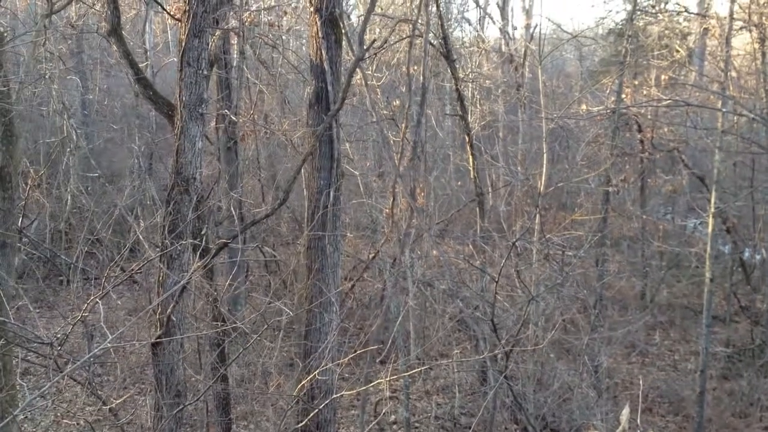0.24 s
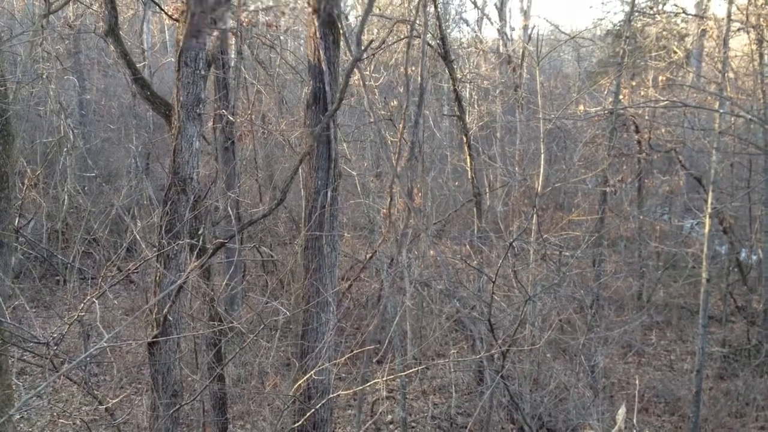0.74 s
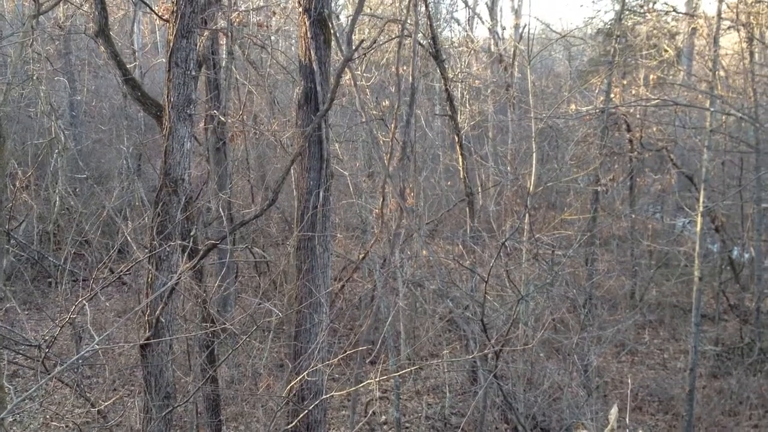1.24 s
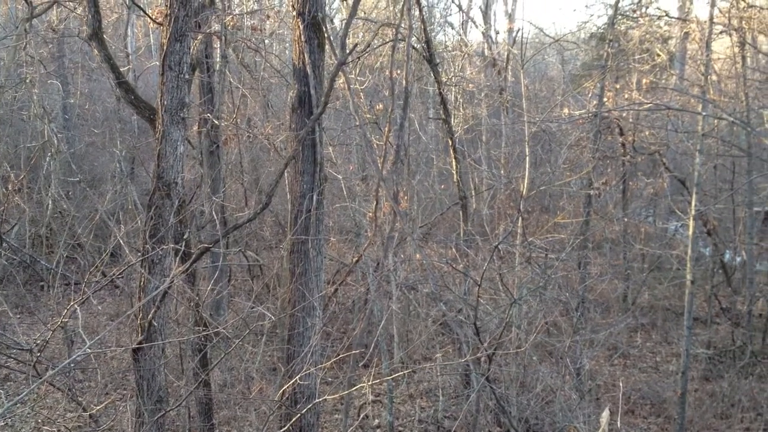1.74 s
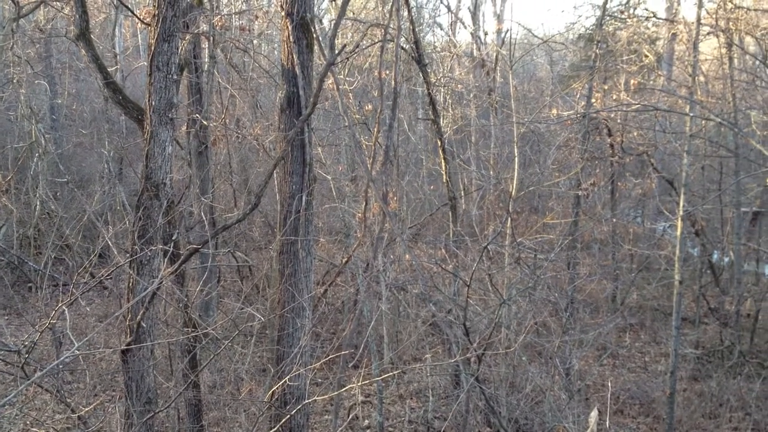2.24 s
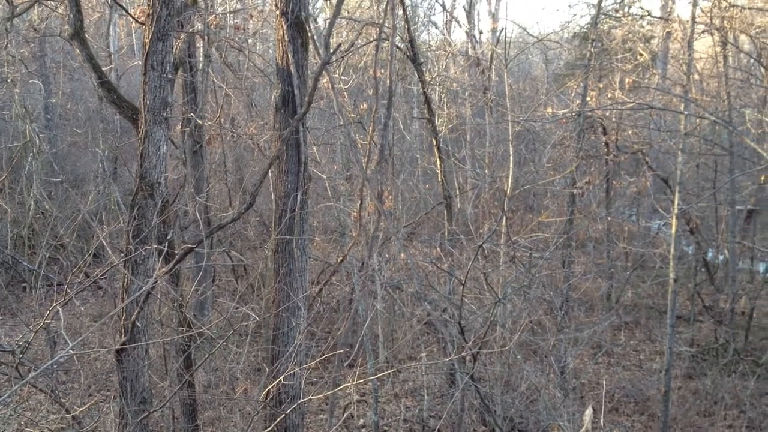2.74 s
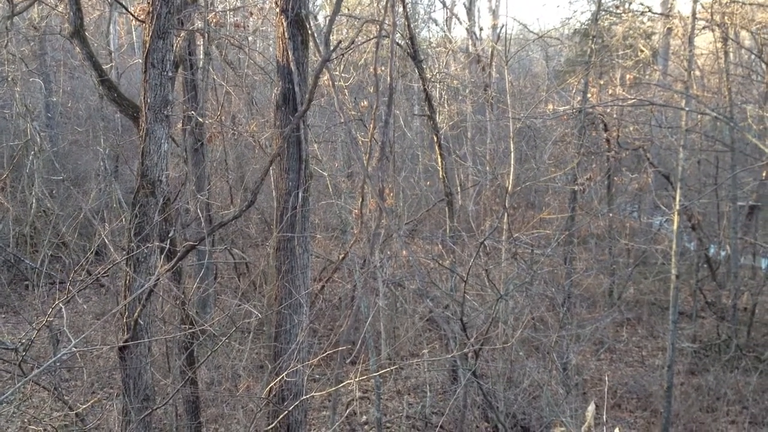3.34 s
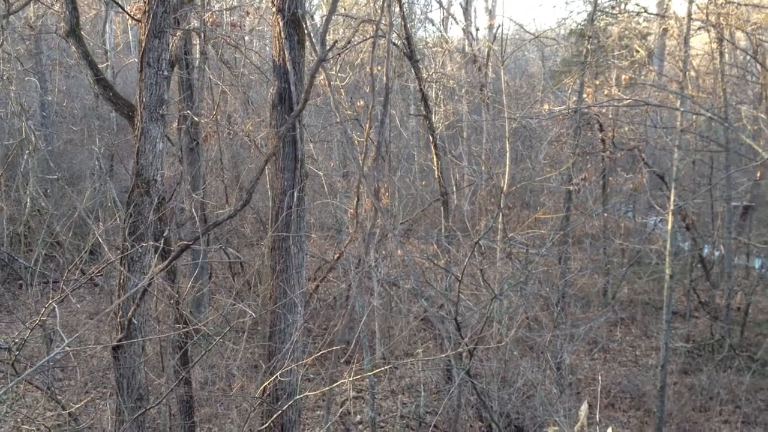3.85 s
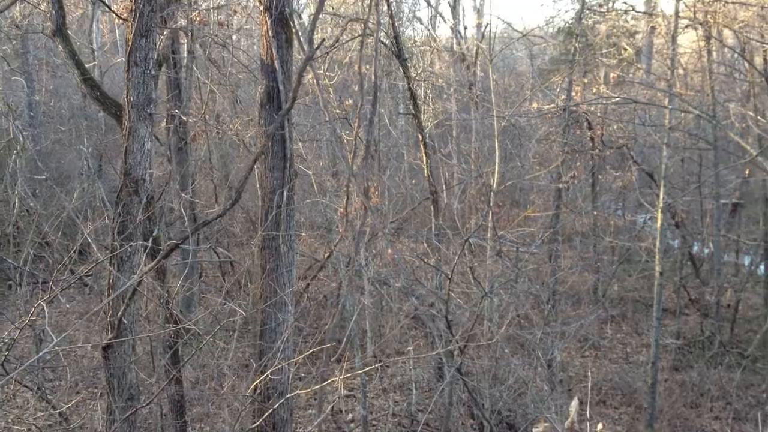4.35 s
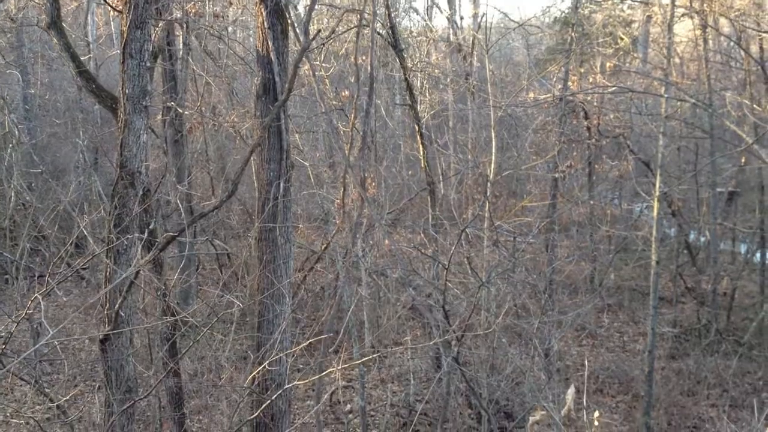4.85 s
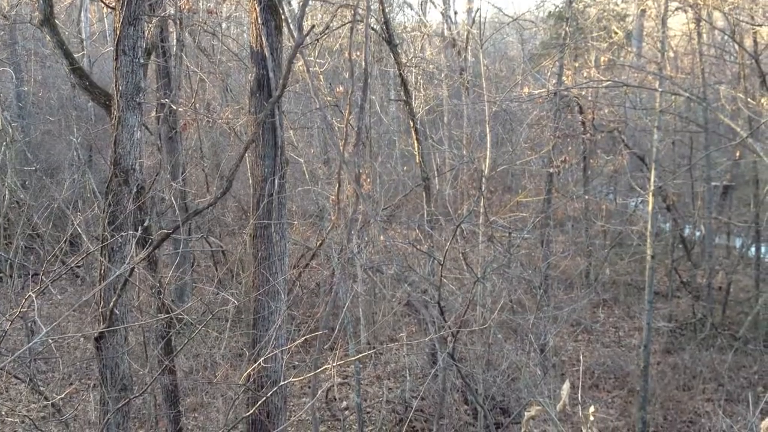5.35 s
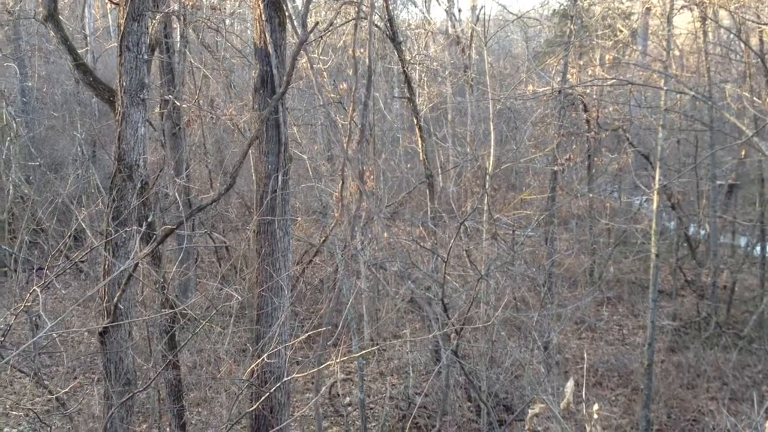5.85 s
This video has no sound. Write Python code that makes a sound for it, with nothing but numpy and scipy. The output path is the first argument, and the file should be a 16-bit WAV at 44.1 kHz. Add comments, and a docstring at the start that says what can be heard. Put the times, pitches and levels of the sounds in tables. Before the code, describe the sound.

A distant hound bays eight times at a steady pace, echoing through quiet woods, with a few faint bird chips.

```python
"""Over faint hiss, a hound is already baying on a scent, far off in bare winter woods.
Each of its eight bays opens wide-mouthed and bright, flips up into a pure hoot as the muzzle closes,
then drops away; trunks scatter it into a long ringing tail. A small bird chips three times early on,
a twig ticks midway, and the bird chips once more after the last bay."""
import sys
import numpy as np
from scipy import signal
from scipy.fft import rfft, irfft, next_fast_len
from scipy.io import wavfile

SR = 44100
rng = np.random.default_rng(int(sys.argv[2]) if len(sys.argv) > 2 else 0)


def unload_wav(signal):
    """Save mono or channel-first audio to the path in sys.argv[1] as 16-bit WAV at rate SR, clipped to [-1, 1]."""
    wavfile.write(
        sys.argv[1],
        SR,
        np.round(np.clip(np.atleast_2d(signal).T, -1, 1) * 32767).astype(np.int16),
    )


N = 268128
LEAD = int(.25 * SR)   # samples before time zero
TRACK_SIZE = LEAD + N


# Bays: start_s, cry_s, hoot_s, cry_hz, hoot_hz, scoop_s, sag_hz_per_s, cry_db, hoot_db, attack_s,
# release_db, cry_octave_db, hoot_octave_db, cry_upper_db
BAY_CALLS = [ (-.125, .085, .125, 472, 532.4, 0.055, 310, -37.5, -31, 0.028, 48.5, -2, -21, -12),
             (0.671, 0.07, 0.11, 466.6, 526.3, 0.016, 280, -40, -34.5, 0.011, 20, 5, -23.5, -8.5),
             (1.4, 0.08, 0.13, 458.7, 514.5, 0.05, 297.5, -37, -38, 0.029, 23, 1, -21, -4),
             (2.156, .089, .11, 460.5, 523.5, 0.041, 305, -37, -36.5, 0.033, 23.5, 7, -18.5, -8),
             (2.825, .085, .11, 448, 490.8, 0.044, 510, -45.5, -52, 0.015, 15, -6.5, 5, -10),
             (3.543, .094, .135, 489, 536.2, .038, 823, -35.5, -33.5, 0.022, 38.5, -1.5, -21.5, -6.5),
             (4.233, 0.1, .108, 468.4, 523.2, 0.063, 607, -37, -31.5, 0.025, 31, -6, -31, -10),
             (4.95, .091, 0.094, 463.6, 523.3, 0.038, 285, -38, -33, 0.03, 24.5, -2, -26.5, -6.5), ]

def hound():
    """The dog runs on between bays, so each one rings differently through the trees."""
    out = np.zeros(TRACK_SIZE)
    for start_s, *shape in BAY_CALLS:
        add(out, start_s, woods(voice(*cry_to_hoot(*shape)), wet_db=-5.5))
    return out


def cry_to_hoot(cry_s, hoot_s, cry_hz, hoot_hz, scoop_s, sag_hz_per_s, cry_db, hoot_db, attack_s,
                release_db, cry_octave_db, hoot_octave_db, cry_upper_db):
    """The cry scoops up and sags as the jaw opens; the muzzle closes into a hoot that holds, then falls."""
    attack_depth_db, opening_db_per_s, flare_db = 31.5, 167, 11
    flip_s, flip_dip_db, climb_s, brightening_db = .0068, 3, .011, 18.5
    t = np.arange(int((cry_s + hoot_s) * SR)) / SR
    scoop = np.maximum(1 - t / scoop_s, 0) ** 2
    # rows: pitch_hz, level_db, octave_db, upper_db
    cry = np.array([
        cry_hz * (1 - .24 * scoop) - sag_hz_per_s * np.maximum(t - scoop_s, 0),
        cry_db - attack_depth_db * np.exp(-t / attack_s),
        cry_octave_db + opening_db_per_s * (t - cry_s / 2),
        cry_upper_db - flare_db * np.clip(2 * t / cry_s - 1, 0, 1) ** 2])
    since_flip_s = np.maximum(t - cry_s, 0)
    progress = since_flip_s / hoot_s
    release = progress ** 2.9
    hoot = np.array([
        hoot_hz * (1 - .063 * np.exp(-since_flip_s / climb_s) - .42 * progress ** 4.6),
        hoot_db - release_db * release,
        hoot_octave_db + brightening_db * release,
        -29 + brightening_db * release])
    closed = (1 + np.tanh((t - cry_s) / flip_s)) / 2
    pitch_hz, level_db, octave_db, upper_db = cry + closed * (hoot - cry)
    dip_db = flip_dip_db / np.cosh((t - cry_s) / flip_s)
    share_db = -10 * np.log10(1 + from_db(octave_db) ** 2)   # fundamental and octave share the power
    return pitch_hz, level_db - dip_db + share_db, octave_db, upper_db - share_db


# Throat response for the upper partials: freq_hz, gain_db
THROAT_RESPONSE = [(1000, 13.5), (1370, -5.5), (1830, -10), (2330, -12.5), (2650, -35), (3500, -39.5),
                   (4700, -27), (6000, -74)]
# Escaping breath spectrum: freq_hz, relative_db
RASP_SPECTRUM = [(60, -50), (150, -23), (350, -60), (600, 10.5), (950, -7), (1400, -14), (2300, -10.5),
                 (2900, -62), (6000, -37), (10000, -57)]

def voice(pitch_hz, level_db, octave_db, upper_db, slack_hz=385, taut_hz=445, hoot_hz=500):
    """Vocal folds give harmonics and a puff of air each cycle; slack or weakly driven, they turn hoarse."""
    shimmer, flutter, rasp_db, growl_db, full_voice_db = .091, .37, -26.5, -25, -45
    size = len(pitch_hz)
    t = np.arange(size) / SR
    slack = np.clip((taut_hz - pitch_hz) / (taut_hz - slack_hz), 0, 1)
    jitter = (.0042 + .018 * slack) * drift(110, size)
    phase = 2 * np.pi * np.cumsum(pitch_hz * (1 + jitter)) / SR
    low = np.sin(phase) + from_db(octave_db) * np.sin(2 * phase)
    upper = sum(gain_at(THROAT_RESPONSE, k * pitch_hz) * np.sin(k * phase + k * k) for k in range(3, 12))
    tone = low * (1 + shimmer * drift(73, size))
    tone += from_db(upper_db) * upper * (1 + flutter * drift(150, size))
    openness = np.sqrt(from_db(octave_db) ** 2 + from_db(upper_db) ** 2 + .29)
    puffs = noise(RASP_SPECTRUM, SR)[:size] * (1 + np.cos(phase)) / 2
    weakness = np.clip((full_voice_db - level_db - 20 * np.log10(openness)) / 10, 0, 1)
    hoarseness_db = np.maximum(20 * slack, 17 * weakness)
    rasp = openness * from_db(rasp_db + hoarseness_db) * puffs
    # alternate cycles differ as the voice flips up: a weak line between the first two partials
    flipped = np.clip((pitch_hz - taut_hz) / (hoot_hz - taut_hz), 0, 1) ** 2
    growl = from_db(growl_db) * flipped * drift(30, size) * np.sin(1.5 * phase)
    fade = np.clip(np.minimum(t, t[-1] - t) / .00098, 0, 1)
    return np.sqrt(2) * from_db(level_db) * fade * (tone + rasp + growl)


# Trunk echo envelope at nearness 1: delay_s, relative_db
ECHO_DECAY = [(0.01, 1.5), (.05, -3.5), (.11, -5), (0.202, -10.5), (.3, -15), (.45, -19.5), (.6, -23),
              (.9, -32), (1.3, -56)]
# Trunk echo colour: freq_hz, gain_db
ECHO_COLOUR = [(200, -31), (430, -3.5), (520, 1.5), (920, 2.5), (1400, 5), (2300, 3), (7000, 5)]

def woods(x, wet_db, nearness=1.0, echoes_per_s=900):
    """Direct sound plus a small echo from each trunk, new for each position; nearness shortens the tail."""
    delay_s, echo_db = np.transpose(ECHO_DECAY)
    t = np.arange(SR + SR // 2) / SR * nearness
    echoes = rng.standard_normal(len(t)) * (rng.random(len(t)) < echoes_per_s / SR)
    echoes *= from_db(np.interp(t, delay_s, echo_db)) * (t > delay_s[0]) * (t < delay_s[-1])
    echoes /= np.sqrt(np.sum(echoes ** 2))
    response = from_db(wet_db) * coloured(echoes, ECHO_COLOUR)
    response[0] += 1   # direct path
    return signal.fftconvolve(x, response)


# Bird chips: start_s, relative_db, nominal_pitch_hz
BIRD_CHIPS = [(0.0942, -51.5, 7490), (0.5296, -59.5, 7200), (1.7672, -60.5, 7560), (5.5792, -57, 7720)]

def bird(swell_s=.0032, slide_s=.009, gain_db=-7):
    """Each chip is a thin whistle that slides quickly down, in nearby brush."""
    out = np.zeros(TRACK_SIZE)
    t = np.arange(SR // 20) / SR
    envelope = t / swell_s * np.exp(1 - t / swell_s)
    for start_s, relative_db, nominal_pitch_hz in BIRD_CHIPS:
        pitch_hz = nominal_pitch_hz * (.97 + .08 * np.exp(-t / slide_s))
        whistle = np.sin(2 * np.pi * np.cumsum(pitch_hz) / SR)
        chip = from_db(relative_db + gain_db) * envelope * whistle
        add(out, start_s, woods(chip, wet_db=1, nearness=6.5))
    return out


# Twig ticks: start_s, level_db
TWIG_TICKS = [(3.321, -58.5)]
# Crack spectrum: freq_hz, relative_db
CRACK_SPECTRUM = [(800, -14), (3500, -7), (6800, 0), (9000, -6), (14000, -20)]

def twig(decay_s=.0018):
    """Dry wood gives a sharp crack that the nearby brush scatters."""
    out = np.zeros(TRACK_SIZE)
    t = np.arange(SR // 100) / SR
    for start_s, level_db in TWIG_TICKS:
        crack = from_db(level_db) * np.exp(-t / decay_s) * noise(CRACK_SPECTRUM, len(t))
        add(out, start_s, woods(crack, wet_db=3, nearness=4.0))
    return out


# Background spectrum: freq_hz, relative_db
AIR_SPECTRUM = [(25, -38), (55, -29), (80, -14.5), (115, -6), (170, 0), (270, -2.5), (370, -6.5),
                (700, -9.5), (1150, -12), (2500, -17), (4700, -19.6), (5400, -22), (8000, -24),
                (10000, -28.4), (13000, -25.6)]

def air(level_db=-63.4):
    """Steady distant rumble and faint hiss."""
    return from_db(level_db) * noise(AIR_SPECTRUM, TRACK_SIZE)


def from_db(db):
    """Decibels to gain."""
    return 10 ** (np.asarray(db) / 20)


def rms_one(x):
    """Scale to rms 1."""
    return x / np.sqrt(np.mean(x ** 2) + 1e-20)


def gain_at(curve, freq_hz):
    """Gain of a freq_hz, gain_db curve, read on a log-frequency axis."""
    curve_hz, curve_db = np.transpose(curve)
    return from_db(np.interp(np.log(np.maximum(freq_hz, 1)), np.log(curve_hz), curve_db))


def coloured(x, curve):
    """Filter by a freq_hz, gain_db curve."""
    size = next_fast_len(len(x))
    freq_hz = np.arange(size // 2 + 1) * SR / size
    return irfft(rfft(x, size) * gain_at(curve, freq_hz), size)[:len(x)]


def noise(curve, size):
    """Coloured noise, rms 1."""
    return rms_one(coloured(rng.standard_normal(size), curve))


def drift(rate_hz, size):
    """Random wander below rate_hz, rms about 1."""
    lowpass = signal.butter(2, rate_hz, fs=SR, output="sos")
    return rms_one(signal.sosfilt(lowpass, rng.standard_normal(SR)))[:size]


def add(track, start_s, sound):
    """Mix a sound into the track from start_s on."""
    start = LEAD + int(start_s * SR)
    track[start:start + len(sound)] += sound[:len(track) - start]


def scene():
    """Hound, bird and twig among the trees, over still air; mono."""
    background = air()
    return (hound() + bird() + twig() + background)[None, LEAD:]


def record(dry, low_cut_hz=59, high_cut_hz=15150, fade_s=.002):
    """The small microphone loses the deep bass; the top is cut steeply."""
    fade_in = np.minimum(np.arange(N) / SR / fade_s, 1)
    highpass = signal.butter(2, low_cut_hz, "high", fs=SR, output="sos")
    lowpass = signal.ellip(12, .1, 70, high_cut_hz, fs=SR, output="sos")
    return signal.sosfilt(lowpass, signal.sosfilt(highpass, dry * fade_in))


dry = scene()
out = record(dry)
unload_wav(out)
```